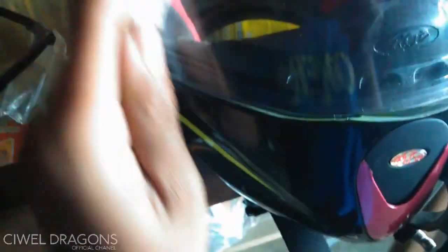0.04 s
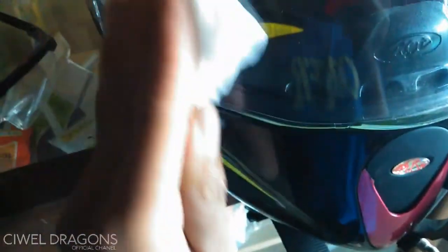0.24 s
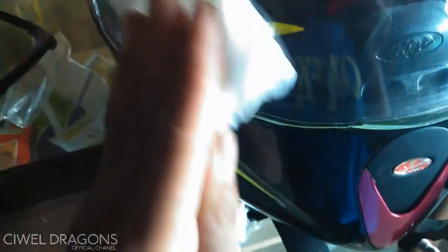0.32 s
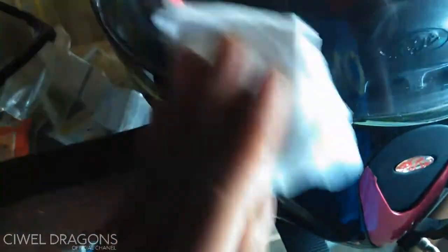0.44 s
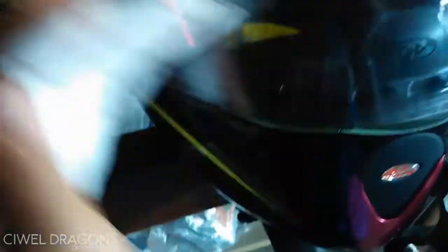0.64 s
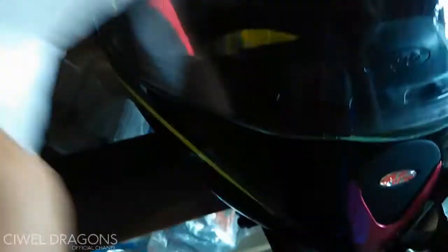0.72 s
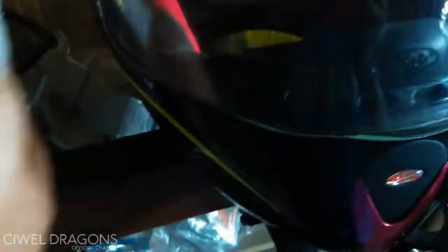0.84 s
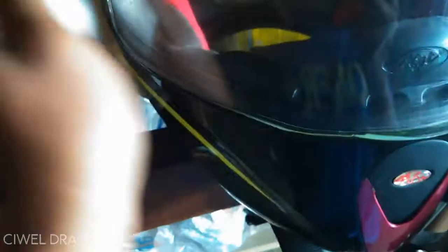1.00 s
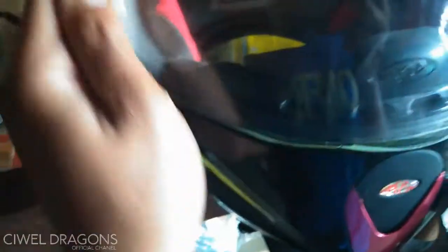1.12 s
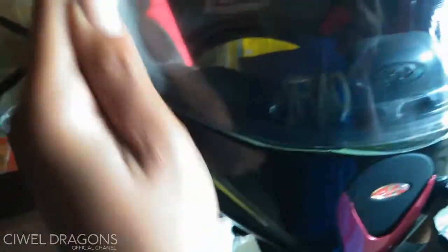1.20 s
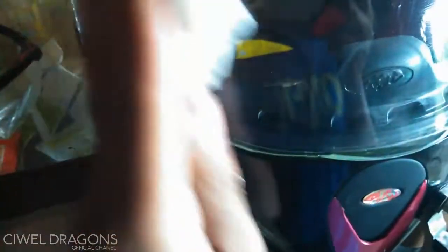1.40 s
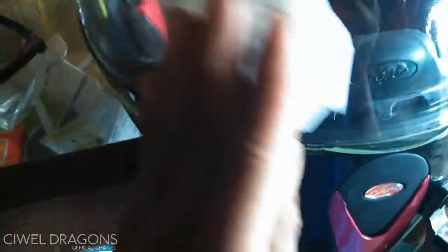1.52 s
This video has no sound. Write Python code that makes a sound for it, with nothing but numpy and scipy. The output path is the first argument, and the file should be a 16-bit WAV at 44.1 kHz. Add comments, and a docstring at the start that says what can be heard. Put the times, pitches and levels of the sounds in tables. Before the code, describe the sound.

Four squeaky, raspy wipes of a cloth on a plastic helmet visor follow one another quickly, close to the microphone. The hand softly bumps the shell, and the last stroke fades in a small room with a faint low throb.

```python
"""A faint low throb, like a far engine idling, and still air sound throughout in a small room.
Close to the microphone a cloth starts lightly over a helmet's plastic visor, then wipes to and fro.
In four firm pushes, stick-slip friction rings the visor, the fibres hiss, the weave rasps and squeaks,
and the hand rumbles and bumps the shell. The cloth catches with a tick as the first two pushes begin;
a light return follows the first and third. The last push dies away in the room's short reverberation."""
import sys
import numpy as np
from scipy import signal
from scipy.fft import rfft, irfft
from scipy.io import wavfile

SR = 44100
rng = np.random.default_rng(int(sys.argv[2]) if len(sys.argv) > 2 else 0)


def store_wav(level_fs):
    """Save 16-bit WAV to argv[1]."""
    pcm = np.round(np.clip(np.atleast_2d(level_fs), -1, 1) * 32767)
    wavfile.write(sys.argv[1], SR, pcm.T.astype(np.int16))


N = 68355
T, HZ = np.arange(N) / SR, np.arange(N + 1) * SR / (2 * N)


def undb(db):
    """Amplitude ratio of a level in decibels."""
    return 10 ** (np.asarray(db) / 20)


def colour(points):
    """Frequency response interpolated through (f/Hz, level/dB) points."""
    hz, db = np.array(points).T
    return undb(np.interp(np.log(HZ + 1), np.log(hz), db))


def filtered(x, response):
    """Linear filtering: the spectrum is multiplied by a response."""
    return irfft(rfft(x, 2 * N) * response)[..., :N]


def unit(x):
    """Normalisation to rms 1."""
    return x / np.sqrt(np.mean(np.abs(x) ** 2))


def resonance(hz, width):
    """Response of a damped oscillator with a half-power width in Hz."""
    return 1j * HZ * width / (hz ** 2 - HZ ** 2 + 1j * HZ * width)


def flutter(db, hz):
    """Random amplitude modulation: low-passed noise moves the level by db rms."""
    return undb(db * unit(filtered(rng.standard_normal(N), 1 / (1 + (HZ / hz) ** 4))))


# spectrum of the throb: f/Hz, relative level/dB
THROB = [(25, -30), (45, -40), (68, 0.5), (90, -6), (115, 10), (160, -4), (210, 0.5), (310, -20), (450, -6),
         (700, -28), (1500, -42), (6000, -90)]
def throb(rate_hz=22.23, jitter_s=.0003, scatter_db=3, level_db=-65.5):
    """Dispersion: a nearly periodic pulse train is smeared in phase, as if by distance."""
    timing, strength = rng.standard_normal((60, 2)).T
    times = (np.arange(60) + .5) / rate_hz + jitter_s * timing
    pulses = np.bincount(np.abs(times * SR).astype(int), undb(scatter_db * strength), N)[:N]
    smear = rfft(rng.standard_normal(N) * np.exp(-T / 0.013), 2 * N)
    return undb(level_db) * unit(filtered(pulses, colour(THROB) * smear / np.abs(smear)))


# spectrum of still air: f/Hz, relative level/dB
AIR = [(25, -12), (90, 1), (300, -3.5), (600, -11), (1200, -18.5), (3000, -24.5), (8000, -21),
       (12000, -21.5), (15000, -39)]
def still_air(level_db=-61):
    """Diffuse noise: coherence between the two microphone ports falls with frequency."""
    apart = np.minimum(HZ / 900, 1)
    common = filtered(rng.standard_normal(N), colour(AIR) * np.sqrt(1 - apart ** 2))
    separate = filtered(rng.standard_normal((2, N)), colour(AIR) * apart)
    return undb(level_db) * unit(common + separate)


def slips(per_s, scatter_db=2.0):
    """Stick-slip friction: dense random impulses of uneven size, drawn for each port."""
    impulses = (rng.random((2, N)) < per_s / SR) * rng.choice([-1., 1.], (2, N))
    return unit(impulses * undb(scatter_db * rng.standard_normal((2, N))))


def stroke(peak, rise, fall, rise_power, fall_power, edge_db=-22):
    """Friction envelope: the level grows as the hand speeds up and falls as it eases off."""
    offset = np.abs(T - peak)
    drop = np.where(T < peak, (offset / rise) ** rise_power, (offset / fall) ** fall_power)
    return undb(edge_db * np.minimum(drop, 10))


# broad response of the visor: f/Hz, relative level/dB
VISOR = [(300, -32.5), (650, -28.5), (880, -19.5), (1130, -13.5), (1230, -4.5), (1500, -1), (1850, -0.5),
         (2080, -6.5), (2650, -6), (2830, -25), (3500, -31.5), (6000, -38.5)]
# modes of the visor: f/Hz, width/Hz, level/dB above the broad response
VISOR_MODES = [(1307, 29, 10), (1410, 55, 6), (1484, 38, 7), (1842, 26.4, 10.5), (2437, 52, 6),
               (2613, 64, 5)]
def visor_body(force, tuning):
    """Modal superposition: slips drive visor modes that shift with the hand's hold."""
    modes = 1 + sum((undb(db) - 1) * resonance(hz * tuning, width) for hz, width, db in VISOR_MODES)
    return filtered(force, unit(colour(VISOR) * modes))


def ring(force, hz, width_hz):
    """Resonance: one lightly damped mode draws a pitch from a broadband force."""
    return filtered(force, unit(resonance(hz, width_hz)))


# spectrum of the fibre hiss: f/Hz, relative level/dB
FIBRES = [(1500, -39), (2850, -13.5), (3050, -9.5), (3500, -12), (4400, -7.5), (5400, -6), (6500, -10.5),
          (7600, -2), (8800, 1), (9500, -5.5), (10600, -18), (12500, -29), (15500, -38)]
def hiss_response(t60_s=0.062, ripple_db=3.3):
    """Modal overlap: the visor's many close upper modes ripple the fibres' hiss above 2 kHz."""
    modes = rfft(rng.standard_normal(N) * undb(-60 * T / t60_s), 2 * N)
    ripple = undb(ripple_db * unit(modes) * np.sqrt(2) * np.clip(HZ / 2000 - 1, 0, 1))
    return unit(colour(FIBRES) * ripple)


def weave_rasp(force):
    """Band-limited friction noise: the coarser slips of the weave."""
    return filtered(force, unit(resonance(4450, width=970) ** 2))


# response of the helmet's shell: f/Hz, relative level/dB
SHELL = [(25, -42), (55, -3.5), (110, 4.5), (160, -4.5), (250, -4), (360, -12), (500, -10), (700, -28.5),
         (1500, -29), (6000, -80)]
def shell_rumble(force):
    """Forced vibration: the hand's drag shakes the shell at low frequencies."""
    return filtered(force, unit(colour(SHELL)))


# wipes: peak t/s, rise t/s, fall t/s, visor level/dB; hiss lag t/s, rise t/s, fall t/s, level/dB;
# then level/dB of shell rumble, low ring, main ring, shell note, rasp, squeak
WIPES = [(0.005, 0.017, 0.076, -44.5, .0, .05, 0.088, -46, -61.5, -75, -57, -69, -55, -73),
         (0.214, 0.12, 0.13, -31, 0.022, 0.12, 0.12, -31.5, -53.5, -43, -34, -52, -42, -48),
         (0.385, 0.032, 0.12, -60.5, 0.015, 0.03, 0.034, -59, -62, -78, -69, -65, -91, -78),
         (0.528, 0.097, .14, -31.5, 0.00038, .082, 0.15, -31, -53, -43, -42, -55.5, -42, -42),
         (0.855, 0.11, 0.13, -32.5, .0, 0.095, 0.13, -31.5, -54.5, -48.5, -40, -51.5, -44.5, -47),
         (1.031, 0.024, 0.052, -57.5, .0, 0.043, 0.069, -53.5, -73, -73, -60, -73, -89, -70),
         (1.189, 0.086, 0.11, -32.5, .0, 0.089, 0.12, -36, -56, -50, -37.5, -61.5, -42.5, -50)]
# the hand's hold in each wipe: visor tuning ratio; f/Hz of low ring, main ring, squeak, shell note
HOLDS = [(1.0, 1043, 1782, 8460, 256), (1.0, 1043, 1568, 8790, 259), (1.0, 1043, 1826, 8460, 225),
         (1.005, 1047, 1319, 9065, 225), (.955, 996, 1490, 8540, 288), (.955, 996, 1736, 8700, 192),
         (.922, 972, 1444, 8655, 210)]
def wiping(slips_per_s=8000):
    """Source and filter: the friction of each wipe excites visor, fibres, weave and shell."""
    grip = flutter(db=1, hz=22)
    coarse = slips(slips_per_s) * grip * flutter(db=0.75, hz=113)
    fine = slips(slips_per_s * 4) * grip * flutter(db=0.96, hz=300)
    weave = slips(slips_per_s) * grip
    drag = rng.standard_normal(N) + 0.11 * rng.standard_normal((2, N))
    hiss = hiss_response()
    out = 0
    for wipe, (tuning, low_hz, main_hz, squeak_hz, note_hz) in zip(WIPES, HOLDS):
        peak, rise, fall, visor_db, lag, hiss_rise, hiss_fall, hiss_db = wipe[:8]
        rumble_db, low_db, main_db, note_db, rasp_db, squeak_db = wipe[8:]
        push = stroke(peak, rise, fall, rise_power=2.57, fall_power=1.94)
        slide = stroke(peak + lag, hiss_rise, hiss_fall, rise_power=2.2, fall_power=1.74)
        press = push ** 1.82  # the clear rings need a firm press
        out += undb(visor_db) * visor_body(coarse * push, tuning)
        out += undb(low_db) * ring(coarse * press, low_hz, width_hz=14.8)
        out += undb(main_db) * ring(coarse * press, main_hz, width_hz=10.4)
        out += undb(hiss_db) * filtered(fine * slide, hiss)
        out += undb(rasp_db) * weave_rasp(weave * push)
        out += undb(squeak_db) * ring(weave * press, squeak_hz, width_hz=44)
        out += undb(rumble_db) * shell_rumble(drag * push ** 0.53)
        out += undb(note_db) * ring(drag * press, note_hz, width_hz=14.5)
    return out


# catches of the cloth: t/s, level/dB, f/Hz
CATCHES = [(0.116, -36, 4740), (0.452, -38, 1530)]
def catches(decay_s=0.0013):
    """Release of static friction: a short tick where the cloth lets go of the plastic."""
    out = 0
    for time, db, hz in CATCHES:
        burst = rng.standard_normal((2, N)) * (T >= time) * np.exp(-np.abs(T - time) / decay_s)
        out += undb(db) * filtered(burst, unit(resonance(hz, hz * 0.39) ** 2))
    return out


# soft bumps of the hand on the shell: t/s, level/dB, f/Hz
BUMPS = [(0.174, -48, 111), (0.263, -44, 86), (.305, -43.5, 76), (0.493, -52, 102), (0.58, -48, 81),
         (1.171, -43.5, 100), (1.216, -41, 98), (1.446, -48.5, 121)]
def bumps(decay_s=0.013):
    """Damped free vibration: the shell gives under the hand for a cycle or two."""
    out = 0
    for time, db, hz in BUMPS:
        age = np.maximum(T - time, 0)
        out += undb(db) * np.sin(2 * np.pi * hz * age) * np.exp(-age / decay_s)
    return out


# spectrum of the room's tail: f/Hz, relative level/dB
ROOM = [(150, -5), (1050, -6), (1400, 1), (2500, -0.5), (6000, -4), (9000, -0.5)]
def room(direct, t60_s=0.47):
    """Reverberation: a diffuse tail, different at each port, decays exponentially."""
    tail = rng.standard_normal((2, N)) * (T > .004) * undb(-60 * T / t60_s)
    response = unit(rfft(tail, 2 * N)) * colour(ROOM)
    return direct + undb(-11.5) * filtered(direct, response)


# response at the far (right) port: f/Hz, level/dB
FAR_PORT = [(100, -4), (1300, -4.5), (2400, -6), (4400, -4), (6000, -8), (7500, -13.5), (9000, -22),
            (10200, -23), (12000, -11), (15000, -7)]
def scene():
    """Acoustic shadow: the wiping reaches the right port weaker and duller; throb and air add to both."""
    left, right = room(wiping() + catches() + bumps())
    return np.array([left, filtered(right, colour(FAR_PORT))]) + throb() + still_air()


def record(dry, cutoff_hz=15500):
    """Band limiting: a steep low-pass filter removes the highest treble."""
    return signal.sosfilt(signal.ellip(10, .2, 80, cutoff_hz, fs=SR, output="sos"), dry)


dry = scene()
out = record(dry)
store_wav(out)
```